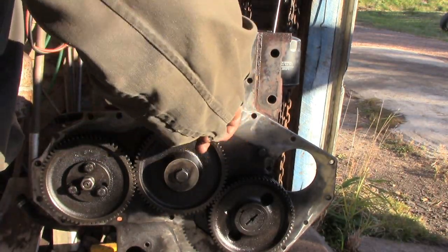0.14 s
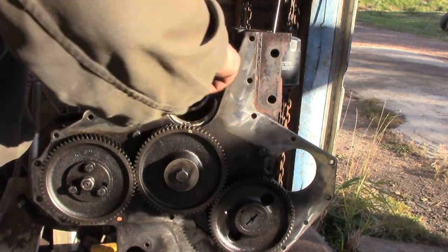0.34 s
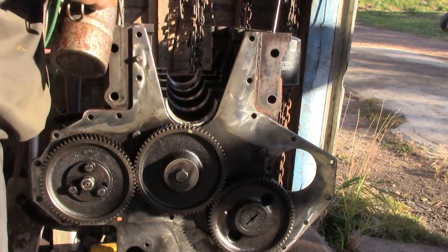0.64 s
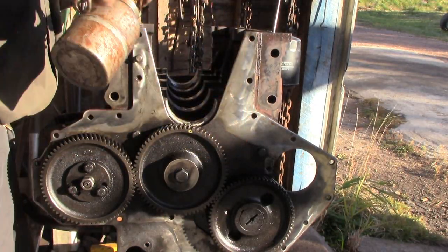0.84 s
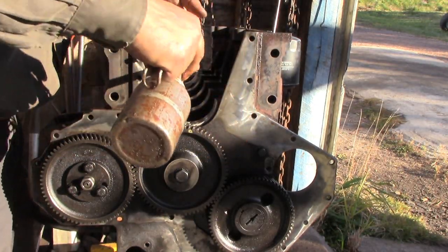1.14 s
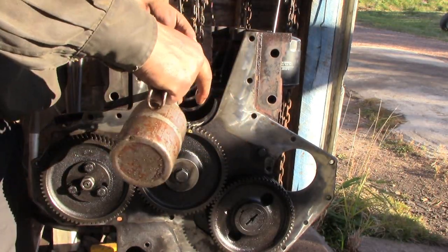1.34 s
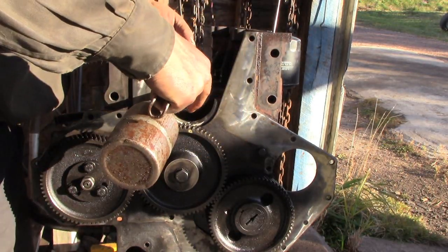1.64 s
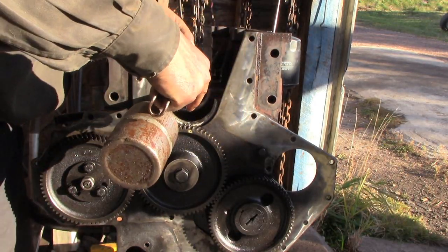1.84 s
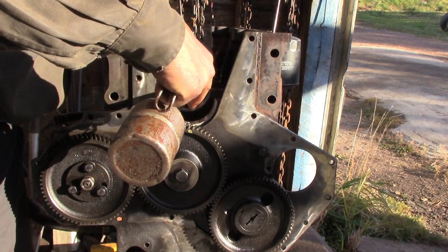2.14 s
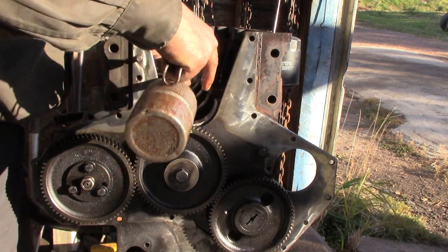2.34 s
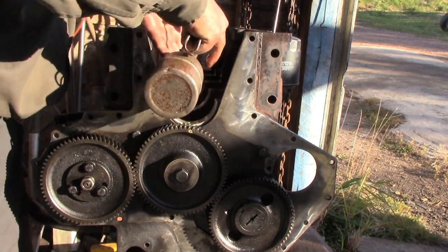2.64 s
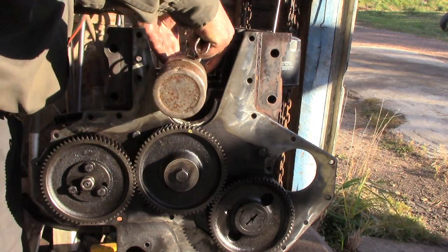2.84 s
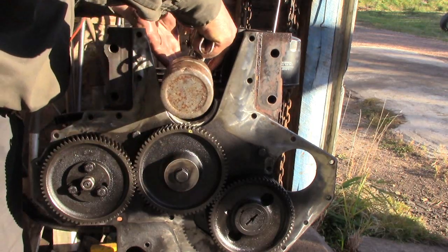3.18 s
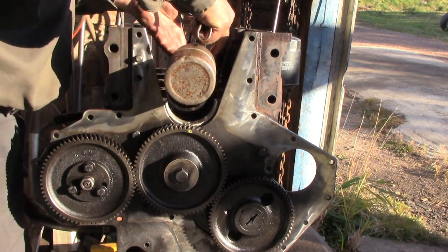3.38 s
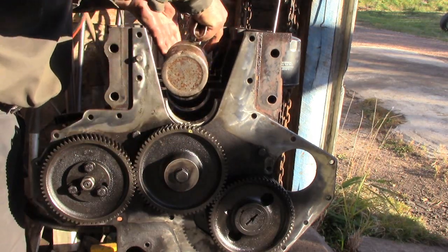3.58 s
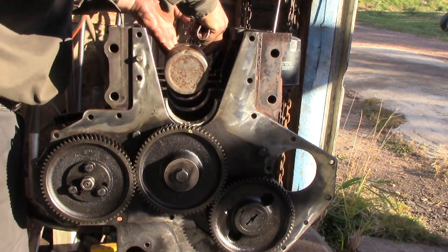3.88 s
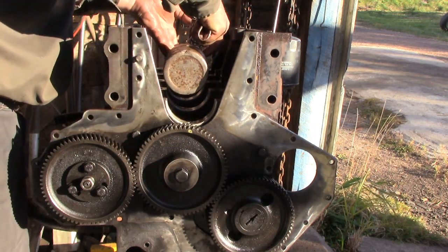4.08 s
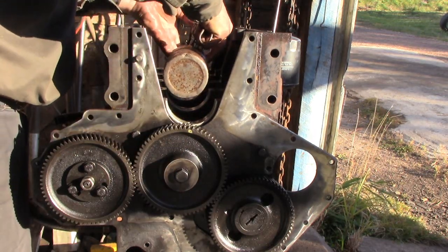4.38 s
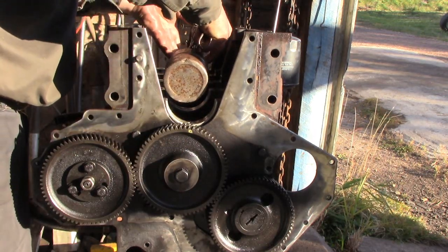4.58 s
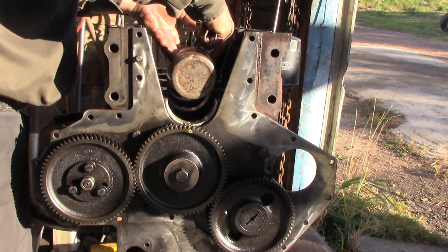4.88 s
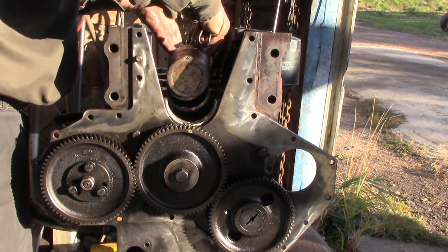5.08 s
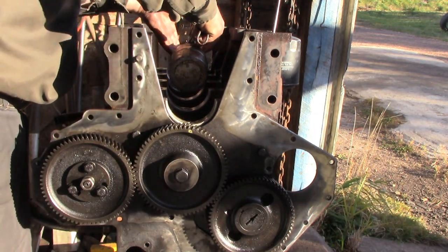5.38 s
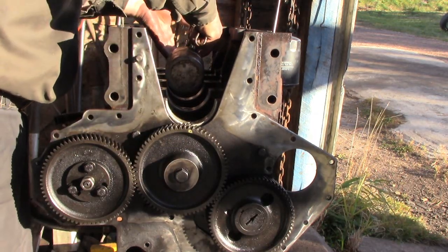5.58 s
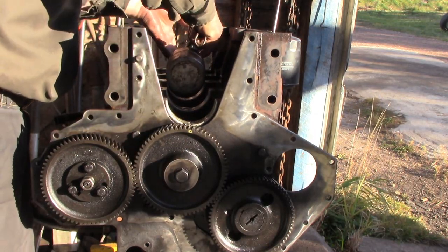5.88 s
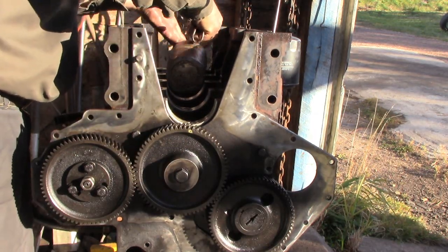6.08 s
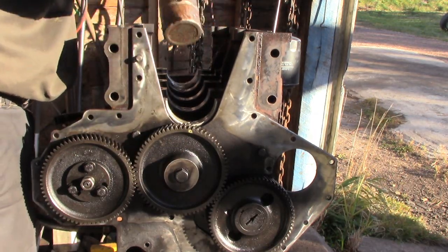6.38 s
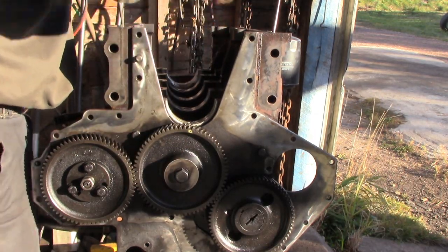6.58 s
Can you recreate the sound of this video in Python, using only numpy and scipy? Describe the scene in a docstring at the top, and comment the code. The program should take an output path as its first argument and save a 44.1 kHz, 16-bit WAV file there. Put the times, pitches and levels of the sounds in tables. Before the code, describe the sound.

Close by in an open shed, a canvas sleeve rustles and a steel oil can is picked up with a bright, ringing clink. After another swish, its plunger clacks sharply twice, ringing can and spring. Softer clacks, faint rubbing and small ticks follow at uneven gaps. Finally the can is put back with a dull clink and a low panel boom. Quiet outdoor air with soft rumble and hiss runs beneath.

```python
"""Pump oil can in an open workshop

A pump oil can is picked up with a clink, worked over an engine block and put down again, over quiet outdoor air.
The plunger's rubbing is grainy noise; its clacks are short cracks that ring the can and a spring.
Clinks are dying sines of steel, light knocks are shorter cracks, and a jacket sleeve swishes as filtered noise.
A panel under the can booms softly as low sines, and a faint tail of noise gives the walls of the shed."""
import sys
import numpy as np
from scipy import signal
from scipy.fft import rfft, irfft
from scipy.io import wavfile
from scipy.ndimage import uniform_filter1d

SR = 44100
rng = np.random.default_rng(int(sys.argv[2]) if len(sys.argv) > 2 else 0)


def transcribe(signal):
    """Save signal, clipped to [-1, 1], as a 16-bit WAV file at the path in sys.argv[1]."""
    frames = np.atleast_2d(signal).T
    limited = np.clip(frames, -1, 1)
    pcm = np.round(limited * 32767).astype(np.int16)
    wavfile.write(sys.argv[1], SR, pcm)


N = 296524  # length of the scene in samples
T = np.arange(SR * 3 // 4) / SR  # time axis of one struck sound [s]

# ringing modes of the plunger and its spring: (frequency [Hz], level [dB], time to fall 60 dB [s])
SPRING = [(957, -10, .11), (1028, -12, .18), (1533, -4, .08), (1680, -19, .3), (2188, -4, .09),
          (2268, -8, .09), (2655, -10, .24), (2760, 1, .11), (2793, -7, .11), (2868, -4, .23),
          (2955, -8, .17), (3010, -4, .07), (3585, -13, .14), (3731, -2, .07), (3853, -7, .07),
          (4475, -9, .08), (4770, -14, .1), (5407, -13, .11), (5712, -12, .08)]
# modes of the can's rim, struck as it is lifted: (frequency [Hz], level [dB], time to fall 60 dB [s])
RIM = [(578, -25, .28), (2698, 1, .23), (2724, -7, .4), (2869, -3, .25), (4545, -13, .07), (5078, -4, .16),
       (5137, -10, .11), (5418, -6, .12), (5604, -12, .07), (5706, -12, .07), (5790, -7, .12),
       (5865, -8, .13), (6433, -24, .2), (7206, -19, .12), (7231, -16, .12), (8061, -24, .2),
       (8093, -24, .2), (11320, -24, .06)]
# modes of the can's base, as it is put back: (frequency [Hz], level [dB], time to fall 60 dB [s])
BASE = [(2689, -4, .45), (2850, -14, .15), (4385, 0, .07), (4635, 1, .07), (5268, -7, .26), (5676, -7, .07),
        (5760, -2, .07), (6900, -12, .08), (7225, -5, .1), (7268, -5, .11)]
# modes of the can's spout: (frequency [Hz], level [dB], time to fall 60 dB [s])
SPOUT = [(872, -4, 0.2), (3080, -8, 0.036), (4420, 0.5, 0.08), (4870, -17, .15), (5840, -20, 0.055),
         (5560, -7.5, 0.072), (7940, -22, 0.032)]
# modes of the can's wall when scraped: (frequency [Hz], level [dB], time to fall 60 dB [s])
WALL = [(1830, -3, 0.074), (1990, 0.5, 0.046), (2880, -1.5, 0.091), (2970, 3, .1), (3585, 4, .07),
        (4120, 1, 0.055), (4625, 6.5, 0.082), (4840, -3, 0.13), (4960, 0, .05), (5210, 11, 0.029),
        (5850, 7, 0.047)]


def amp(db):
    """Turns decibels into a gain."""
    return 10 ** (np.asarray(db) / 20)


def evened(x):
    """Scales a sound to an rms of 1."""
    return x / np.sqrt(np.mean(x ** 2) + 1e-20)


def read(points, hz):
    """Reads a table between its points, on a log-frequency axis."""
    f, value = np.transpose(points)
    return np.interp(np.log(hz + 1), np.log(f + 1), value)


def add(mix, s, sound):
    """Mixes a sound in at time s [s]."""
    part = mix[round(s * SR):][:len(sound)]
    part += sound[:len(part)]


def bins(x):
    """Gives the frequencies in the spectrum of x [Hz], at least 1 Hz."""
    return np.maximum(np.fft.rfftfreq(x.shape[-1], 1 / SR), 1)


def coloured(x, points):
    """Filters noise with a table of levels, then scales it to an rms of 1."""
    spectrum = rfft(x) * amp(read(points, bins(x)))
    return evened(irfft(spectrum, x.shape[-1]))


def ring(modes, bright_db=0):
    """Dying sines of a struck object, tilted about 3 kHz [dB per octave]; neighbours start in opposite directions."""
    swing = np.zeros(len(T))
    for k, (hz, db, t60) in enumerate(modes):
        level_db = db + bright_db * np.log2(hz / 3000)
        swing += (-1) ** k * amp(level_db - 60 * T / t60) * np.sin(2 * np.pi * hz * T)
    return swing * np.minimum(T / 0.0007, 1)  # a soft start of 0.7 ms


def crack(colour_db, t60, scatter_db, chatter_db=9):
    """A brief push, the chatter of the contact and dense scatter in the metal; the energy of 4 ms at rms 1."""
    chatter = amp(chatter_db) * np.exp(-T / 0.00056)
    scatter = rng.choice([-1, 1], len(T)) * (amp(-60 * T / t60) + chatter)
    push = T * np.exp(-T / 4.5e-5)  # the contact lasts a fraction of a millisecond
    drive = push / push.sum() + amp(scatter_db) * scatter / np.linalg.norm(scatter)
    # a minimum-phase filter: nothing sounds before the blow
    log_gain = irfft(np.log(amp(np.maximum(colour_db, -70))), len(T))
    first_half = np.arange(len(T)) < len(T) // 2
    causal = np.exp(rfft(log_gain * 2 * first_half))
    sound = irfft(rfft(drive) * causal, len(T))
    return sound / np.linalg.norm(sound) * np.sqrt(0.004 * SR)


def friction(count, grain_db):
    """Noise whose strength wavers like many tiny slips of uneven size."""
    clumps = evened(uniform_filter1d(rng.standard_normal(count), size=90))
    return rng.standard_normal(count) * amp(grain_db * clumps)


def stroke(length, grain_db):
    """Friction that swells and fades with one movement of the given length [s]."""
    count = int(length * SR)
    return friction(count, grain_db) * np.sin(np.pi * np.arange(count) / count)


def rubbed(slips, body):
    """Every slip sets a ringing body going again."""
    return signal.fftconvolve(slips, body / np.linalg.norm(body))


def ports(a, b):
    """Diffuse sound at two close microphone ports: alike in the bass, mostly unrelated in the treble."""
    # likeness of left and right: (frequency [Hz], likeness [0 to 1])
    likeness = [(60, 0.98), (130, 0.98), (290, 0.85), (640, 0.85), (1410, 0.61), (3100, 0.23), (6800, 0.25),
                (15000, .05)]
    same = np.clip(read(likeness, bins(a)), -1, 1)
    right = same * rfft(a) + np.sqrt(1 - same ** 2) * rfft(b)
    return np.array([a, irfft(right, len(a))])


def air():
    """Outdoor background: filtered noise with a steady low rumble and soft hiss."""
    # colour of the background: (frequency [Hz], relative level [dB])
    air_colour = [(10, -2), (30, 0), (60, -2.5), (110, -8.5), (200, -14.5), (400, -19), (620, -22),
                  (760, -15.5), (980, -24.5), (2000, -27), (4000, -28.5), (8000, -31.5), (12000, -34.5),
                  (15500, -38)]
    return amp(-54) * coloured(ports(*rng.standard_normal((2, N))), air_colour)


def workshop(x, t60=0.23, wet_db=-15):
    """The walls of the open shed return a short, weak tail, made with dying noise."""
    tail = ports(*rng.standard_normal((2, len(T))))
    tail = tail * amp(-60 * T / t60) * np.minimum(T / 0.018, 1)
    return amp(wet_db) * signal.fftconvolve(x[None], tail / np.linalg.norm(tail[0]), axes=1)[:, :N]


def sleeve_speed():
    """Each arm movement speeds up and slows down in a bell; the rustles add in power."""
    # arm movements: (time of full speed [s], time to slow to about a third [s], level [dB])
    swishes = [(0.345, 0.08, -53.5), (0.54, 0.28, -59.5), (0.869, 0.12, -48), (1.22, 0.24, -61.5),
               (1.66, 0.05, -63), (6.3, 0.06, -64), (6.56, 0.2, -63)]
    fidget_db = -73.5  # faint rustle between movements
    t = np.arange(N) / SR
    bells = [amp(db) * np.exp(-((t - s) / slow_s) ** 2) for s, slow_s, db in swishes]
    return np.sqrt(amp(fidget_db) ** 2 + np.sum(np.square(bells), axis=0))


def jacket():
    """Canvas slides on canvas as grainy noise, single threads snag as clicks, and loose folds flap."""
    # colour of the sliding canvas: (frequency [Hz], level [dB])
    cloth_colour = [(180, -25), (350, -1.5), (700, 0), (1080, -3.5), (1500, -3), (1920, 0.5), (2350, -2.5),
                    (2920, 1.5), (3800, -3.5), (4800, -1.5), (6500, -5.5), (8500, -8), (11000, -15),
                    (15000, -41)]
    # flapping folds: (time [s], length [s], level [dB])
    flaps = [(0.43, 0.068, -53.5), (1.28, 0.12, -57)]
    # colour of a flap: (frequency [Hz], level [dB])
    fold_colour = [(80, -3), (280, 4), (550, 1), (900, -16), (3000, -46)]
    snag_per_s = 220
    snagged = rng.random(N) < snag_per_s / SR
    snag_size = amp(1.3 * np.minimum(rng.exponential(1, N), 3))
    snags = snagged * snag_size * rng.choice([-1, 1], N)
    slide = evened(friction(N, grain_db=1)) + amp(-5.5) * evened(snags)
    out = coloured(slide, cloth_colour) * sleeve_speed()
    for s, length, db in flaps:
        count = int(length * SR)
        flap = coloured(rng.standard_normal(count), fold_colour)
        add(out, s, amp(db) * flap * np.hanning(count))
    return out


def panel():
    """A broad panel swells into a low boom of dying sines when the weight on it changes."""
    # modes of the panel under the can: (frequency [Hz], level [dB], time to fall 60 dB [s])
    boom_modes = [(100.3, -34, 1), (82.6, -38, 0.29), (52, -46, .6), (165, -50, 0.44), (350, -60, .3)]
    # the panel is let go, then loaded again: (time [s], level [dB], swell [s])
    loads = [(0.557, -28, 0.019), (0.798, -15, 0.061), (6.511, -2, 0.034)]
    out = np.zeros(N)
    for s, db, swell_s in loads:
        add(out, s, amp(db) * ring(boom_modes) * np.minimum(T / swell_s, 1))
    return out


def ticks():
    """Light knocks damped by the hand; each stirs the spring's modes near its own pitch."""
    # knocks of trigger, fingers and can: (time [s], level [dB], centre [Hz])
    knocks = [(0.833, -37, 4450), (1.004, -48.5, 3780), (1.011, -56, 3800), (1.632, -56.5, 2680),
              (1.678, -53.5, 2960), (1.986, -56, 2800), (2.181, -43.5, 2100), (2.1871, -36, 2170),
              (2.857, -50.5, 2420), (3.8335, -51, 3300), (4.111, -48, 3260), (4.338, -53, 6050),
              (5.514, -51, 2700), (5.52, -47, 2800), (5.5458, -46, 3000), (5.57, -56, 2720),
              (6.3022, -55, 3200), (6.3855, -56, 1990), (6.401, -54, 3800), (6.5003, -44.5, 269),
              (6.5197, -55.5, 7500)]
    half_width_octaves, knock_t60, spring_db = 0.66, 0.099, -19  # decay in s; spring gain on top of the knock's
    out, spring, hz = np.zeros(N), rfft(ring(SPRING)), bins(T)
    for s, db, centre_hz in knocks:
        octaves = np.log2(hz / centre_hz)
        hump_db = -12 * np.log10(1 + (octaves / half_width_octaves) ** 4)
        stirred_spectrum = spring * amp(hump_db + 9.0 * np.log2(hz / 3000))
        stirred = irfft(stirred_spectrum, len(T))[:len(T) // 2]
        add(out, s, amp(db) * crack(hump_db, knock_t60, scatter_db=-2.0))
        add(out, s, amp(db + spring_db) * stirred)
    return out


def clinks():
    """Steel touches steel: a tick and close modes that beat until the hand damps them."""
    # clinks: (time [s], ring level [dB], contact tick level [dB], brightness [dB per octave], modes)
    clink_list = [(.5567, -29.5, -36, 0, RIM), (.6130, -58, -61, 11, RIM), (2.1845, -43, -50, 2, SPOUT),
                  (2.6945, -43, -58, -2, WALL), (3.8313, -52, -56, 0, SPOUT), (4.1107, -48, -50, 2, SPOUT),
                  (6.4515, -46, -49, -3, BASE), (6.4590, -56, -50, 8, BASE)]
    # colour of steel touching steel: (frequency [Hz], level [dB])
    contact_colour = [(100, 3), (500, -7.5), (1300, 1), (2000, -1), (3800, -8.5), (5600, -9), (8000, -4.5),
                      (12000, -13), (15500, -59)]
    grip_s = 0.15  # by then the hand has taken 6 dB off the ring
    out = np.zeros(N)
    grip = amp(-6 * (T / grip_s) ** 3)
    for s, ring_db, tick_db, bright_db, modes in clink_list:
        add(out, s, amp(ring_db) * ring(modes, bright_db) * grip)
        contact = crack(read(contact_colour, bins(T)), t60=0.064, scatter_db=42, chatter_db=7)
        add(out, s, amp(tick_db) * contact)
    return out


def drags():
    """The can drags on steel: grainy slips make its modes sing faintly."""
    # drags: (time [s], length [s], level [dB], modes)
    drag_list = [(0.268, 0.12, -59, RIM), (0.753, 0.22, -51, WALL), (4.26, 0.12, -69, SPOUT)]
    out = np.zeros(N)
    pressed = amp(-60 * T / 0.13)  # pressed steel rings only briefly
    for s, length, db, modes in drag_list:
        body = ring(modes, bright_db=-4) * pressed
        add(out, s, amp(db) * rubbed(stroke(length, grain_db=5.5), body))
    return out


def rubs(rub_spring_db=-5):
    """The plunger rubs in grainy slips, which also make its spring ring."""
    # plunger strokes: (time [s], length [s], level [dB])
    strokes = [(2.145, 0.061, -56.5), (2.936, 0.057, -68.5), (3.168, 0.065, -56), (4.249, 0.083, -61),
               (4.588, 0.079, -68), (4.86, 0.055, -59), (5.769, 0.075, -68.5), (5.853, 0.062, -57.5)]
    # colour of the rubbing: (frequency [Hz], level [dB])
    rub_colour = [(300, -31), (850, 6), (1150, -36), (1550, 4), (1850, -4), (2250, 1.5), (2600, -3),
                  (3000, 12), (3350, -41), (4400, -7.5), (6000, -12), (9000, -24), (15000, -37)]
    out, spring = np.zeros(N), ring(SPRING)
    for s, length, db in strokes:
        slips = stroke(length, grain_db=1.0)
        add(out, s, amp(db) * coloured(slips, rub_colour))
        add(out, s, amp(db + rub_spring_db) * rubbed(slips, spring))
    return out


def clacks(splash_db=-14, splash_t60=0.086):
    """The plunger hits its stop and rings the can, whose note shifts from clack to clack."""
    # pump clacks: (time [s], crack level [dB], brightness [dB per octave], top of the crack [Hz],
    # can note [Hz], note level [dB], note's time to fall 60 dB [s], hollow knock level [dB])
    clack_list = [(2.183, -32, 2.5, 12100, 786, -32, 0.13, -60),
                  (2.6939, -23.5, -1, 6000, 831, -32, 0.1, -53),
                  (4.3278, -40.5, -4, 10000, 876, -45, 0.42, -33.5),
                  (4.9097, -41, -0.5, 7000, 886, -45.5, 0.18, -38.5),
                  (4.9170, -51.5, 9, 10000, 910, -61, 0.092, -62),
                  (5.9026, -47, 3, 9050, 880, -54, 0.096, -65)]
    # colour of a clack: (frequency [Hz], level [dB])
    crack_colour = [(60, -23), (250, -3.5), (450, -0.5), (650, 3), (800, 3), (1180, -28), (1450, -1),
                    (1850, -15), (2250, 1), (2950, -4), (3300, -17), (3750, -7), (4950, -18), (5900, -12),
                    (7000, -19), (8500, -18.5), (15000, -27)]
    # dense high modes of the thin can wall: (frequency [Hz], level [dB])
    splash_colour = [(800, -52), (2000, -27), (3200, 12.5), (3750, -33), (4950, -33), (5400, 0), (6000, -9),
                     (7100, 5), (8400, 13), (10500, -6), (15000, -36)]
    crack_t60 = 0.057  # decay of the crack [s]
    hollow_hz, hollow_t60 = 846, 0.033  # the can's broad, hand-damped mode [Hz, s]
    spring_db, spring_follows = -22.5, 0.76  # spring gain at a 0 dB crack, and its dB per dB of crack
    out, hz, spring = np.zeros(N), bins(T), ring(SPRING)
    for s, db, bright_db, top_hz, note_hz, note_db, note_t60, hollow_db in clack_list:
        # a softer stop loses the top
        hardness_db = bright_db * np.log2(hz / 2000) - 10 * np.log10(1 + (hz / top_hz) ** 8)
        blow = crack(read(crack_colour, hz) + hardness_db, crack_t60, scatter_db=6.5, chatter_db=13.0)
        add(out, s, amp(db) * blow)
        wall_colour = np.column_stack([hz, read(splash_colour, hz) + hardness_db])
        wall = coloured(rng.standard_normal(len(T)), wall_colour)
        splash = wall * amp(-60 * T / splash_t60) * np.minimum(T / 0.0035, 1)
        add(out, s, amp(db + splash_db + bright_db) * splash)
        add(out, s + 0.00095, ring([(hollow_hz, hollow_db, hollow_t60)]))
        body = ring([(note_hz, note_db, note_t60)]) + amp(spring_db + spring_follows * db) * spring
        add(out, s + 0.001244, body)  # the body answers just after
    return out


def scene():
    """All the handling, its reflections and the background."""
    near = jacket() + panel() + ticks() + clinks() + drags() + rubs() + clacks()
    return near + workshop(near) + air()


def record(dry):
    """Two microphone ports, the right one reached first, then a limit on the highest treble."""
    lag_s, edge_hz = 2.3e-5, 15600
    lag = np.exp(-2j * np.pi * bins(dry) * np.array([[lag_s], [0]]))
    pair = irfft(rfft(dry) * lag, N)
    low_pass = signal.firwin(511, edge_hz, window=("kaiser", 9), fs=SR)
    return signal.oaconvolve(pair, low_pass[None], "same")


dry = scene()
out = record(dry)
transcribe(out)
```